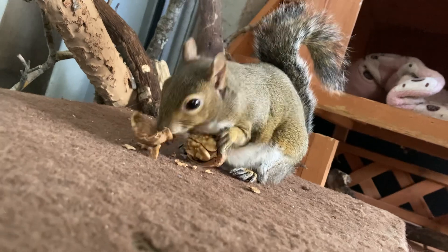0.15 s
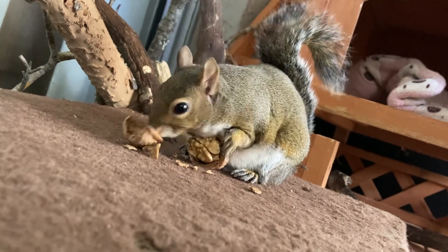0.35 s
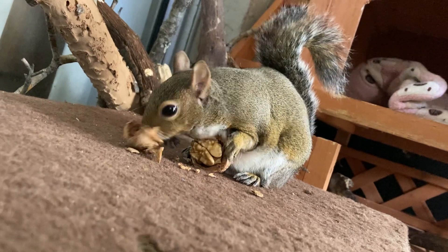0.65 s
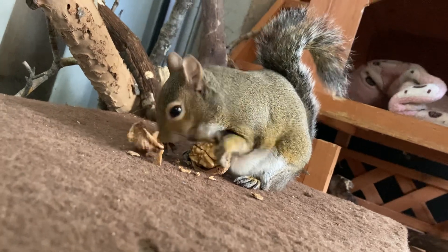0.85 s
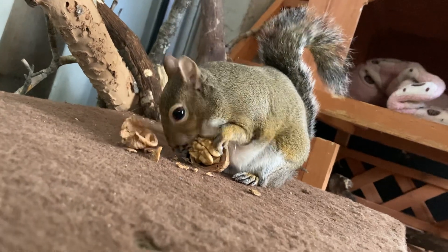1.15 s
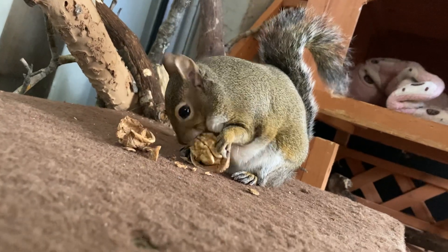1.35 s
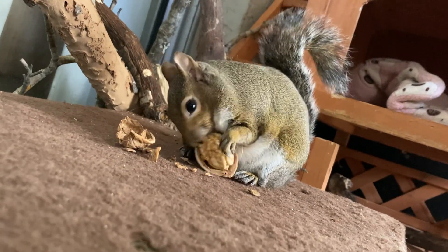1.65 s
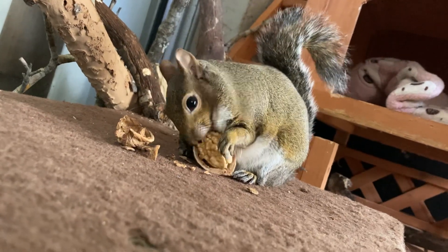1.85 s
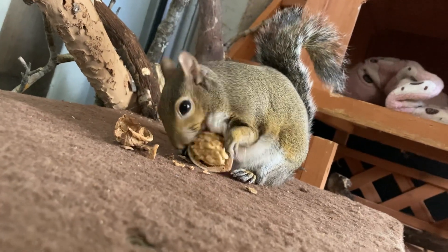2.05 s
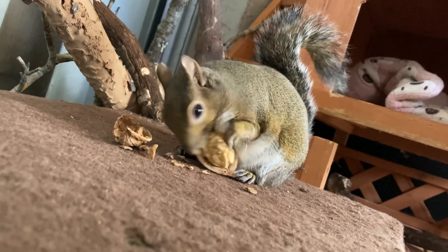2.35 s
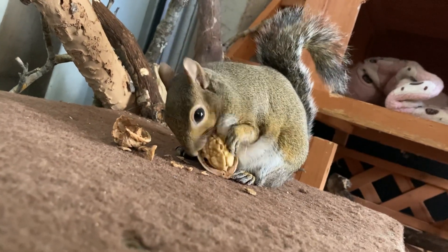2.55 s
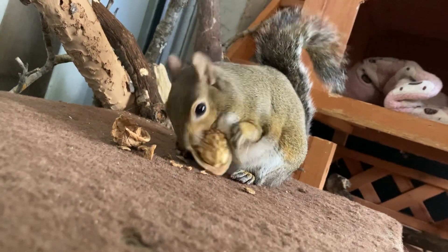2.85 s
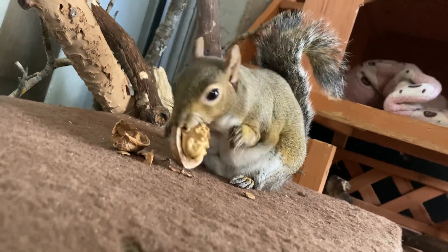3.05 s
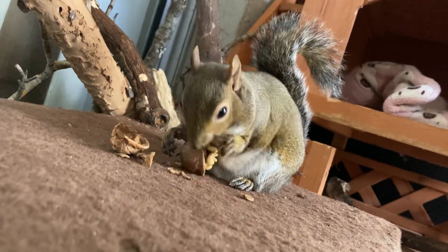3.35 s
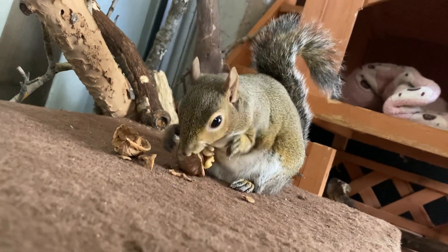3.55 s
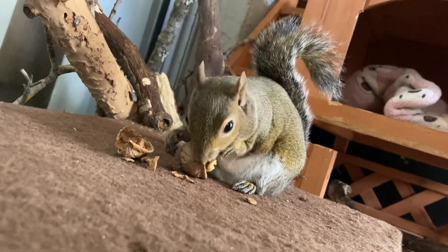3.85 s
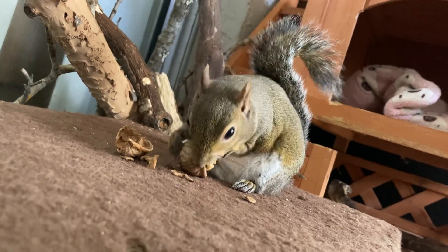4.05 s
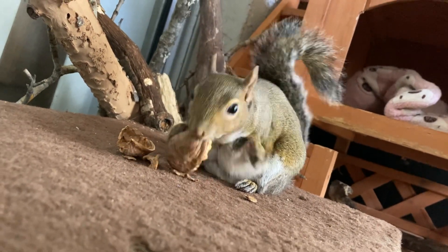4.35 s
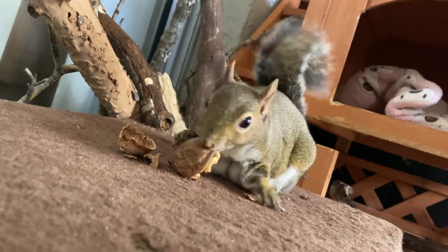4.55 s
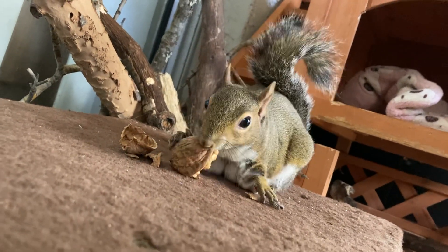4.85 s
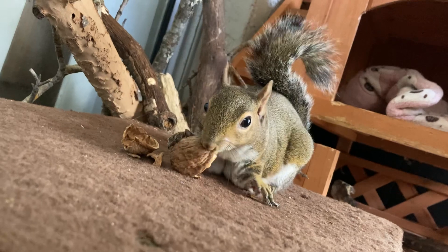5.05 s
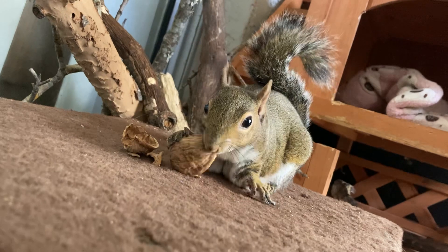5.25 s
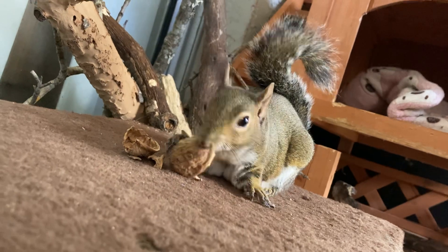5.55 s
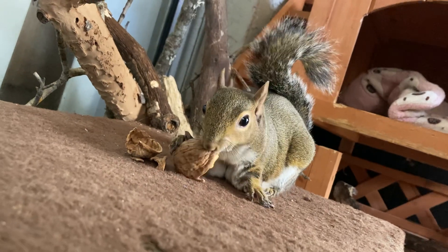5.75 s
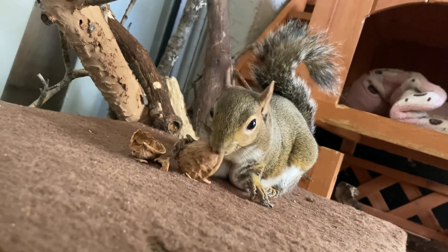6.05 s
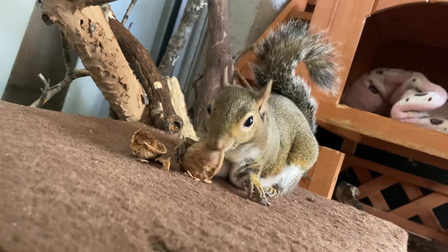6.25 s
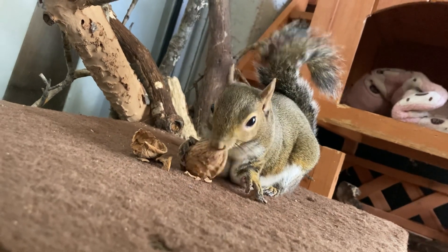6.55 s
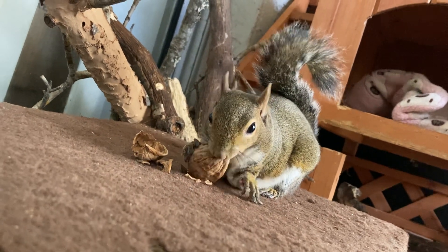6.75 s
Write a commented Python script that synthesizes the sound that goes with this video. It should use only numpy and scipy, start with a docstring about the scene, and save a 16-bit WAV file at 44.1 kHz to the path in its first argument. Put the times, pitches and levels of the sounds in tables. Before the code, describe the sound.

A squirrel gnaws a walnut close to the microphone in a small room with very little echo. A low rumble and wavering hum run throughout, swelling slightly after 4 seconds; a faint distant engine drone fades within the first second. At 0.1 seconds the shell gives a sharp snap. From about 1 to 2.7 seconds come soft ticks, small crunches and light hollow knocks as the shell is turned, then a near lull until 4 seconds. Harder biting follows: a click at 4.2, crunchy cracks around 4.5, a loud snap at 5.3 and a quick cluster near 5.8. More sharp cracks bunch at 6.4, and another loud one comes at 6.8 seconds. The cracks are dry, brittle and bright, with smaller ticks scattered between them. Faint scrapes of teeth on shell and rustles of paws, fur and crumbs fill the gaps.

```python
"""A walnut shell cracks as a squirrel noses, turns and then gnaws it near a two-port microphone.
Each slip of the teeth is a train of fractures that excites the shell's damped modes and radiates a snap.
Between bites, the friction of fur, paws and crumbs makes a rustle; a small room adds a short tail.
Under it lie a low rumble, two wavering hums, a brief faint hiss and, early on, a distant engine."""
import sys
import numpy as np
from scipy import signal
from scipy.fft import rfft, irfft, next_fast_len
from scipy.io import wavfile
from scipy.ndimage import uniform_filter1d

SR = 44100
rng = np.random.default_rng(int(sys.argv[2]) if len(sys.argv) > 2 else 0)


def generate_wav(signal):
    """Clip the signal to [-1, 1] and save it as 16-bit WAV at the path in sys.argv[1]."""
    frames = np.transpose(np.atleast_2d(signal))
    scaled = np.clip(frames, -1, 1) * 32767
    pcm = np.round(scaled).astype(np.int16)
    wavfile.write(sys.argv[1], SR, pcm)


N = 304290

# cracks of the shell: t/s, ring/dB, knock/dB, snap/dB, crunch length/ms, ring centre/Hz,
# snap tilt/(dB per octave)
CRACKS = [(0.1082, -38.5, -71, -21, 0.46, 3630.0, 8.5), (0.1111, -35, -70, -23, 10.9, 3570, 3.0),
          (0.1482, -51, -82, -55, 5, 3400, -3), (0.295, -60.5, -82, -54, 3, 3110.0, 0),
          (0.5037, -61, -65.5, -54, 9.6, 3800, -4), (0.8688, -61, -59, -66.5, 19, 2540, -11.0),
          (0.9279, -57.5, -74, -48, 6.3, 3600.0, 3), (1.1979, -41.5, -49.5, -49, 9.2, 3100, -6),
          (1.224, -51, -71.0, -60, 3.6, 2270, -4), (1.5806, -45, -61.5, -70, 13, 2630, -11),
          (1.823, -47.5, -77, -65, 11.5, 2430, -8.0), (1.959, -44.5, -77, -56, 10, 2490, 3),
          (2.0256, -34.5, -60, -42.5, 8, 2344, 1), (2.162, -47.5, -57, -55, 1.95, 3030, -19),
          (2.375, -50, -55.5, -61, 14, 2880, -7), (2.541, -42.5, -57.5, -54, 17.4, 3200, -7),
          (2.6849, -49.5, -57, -59.5, 21, 2840, -1.0), (3.154, -61.5, -75, -62.5, 35, 3200, -1.5),
          (3.494, -53, -63, -69.5, 7.1, 3500, 0), (4.051, -50, -68, -53, 31, 3400, -1.5),
          (4.137, -48, -72.0, -46.0, 0.97, 3510.0, 2), (4.1572, -31.5, -37.5, -41.5, 1.36, 2780, -10),
          (4.205, -71.5, -70, -49, 3.4, 2570.0, -2), (4.2377, -53, -67, -51.5, 8.1, 2900, 2),
          (4.437, -50.5, -66, -42, 1.6, 3180.0, 2), (4.4923, -21, -44.5, -31.5, 14.6, 2140, 2),
          (4.5632, -61.5, -72.0, -25.5, 1, 3740.0, 1.5), (4.5722, -40, -71, -32, 1.4, 3730.0, -2.0),
          (4.5817, -28.5, -61, -31, 0.84, 3030, -5), (4.6034, -20.5, -50, -20, 18, 2700, 3.5),
          (4.676, -63.0, -80.5, -25.5, 0.6, 2570.0, 11.5), (4.7177, -33, -41.5, -44, 1.1, 2440, -7),
          (4.7663, -41.0, -50, -45, 2, 2610, 4), (4.8398, -47.5, -48, -51, 0.3, 2400, -15),
          (4.865, -50, -79, -42.5, 4.5, 2940.0, -9), (4.884, -42, -79, -41, 1, 3280, 1),
          (4.9763, -36, -48.5, -47, 0.17, 2490, -11), (5.0255, -31.5, -62, -28.5, 1.28, 2400, 0.5),
          (5.0758, -59, -49.5, -77.5, 2.1, 1880.0, -2), (5.132, -44.5, -46.5, -63.5, 0.18, 2400, -16),
          (5.232, -44, -44.5, -44, 0.34, 2340, 4), (5.2722, -42.5, -43, -67, 0.27, 2490, -6),
          (5.282, -45, -59.5, -62, 0.37, 2330.0, -13.0), (5.307, -39, -45, -54, 0.37, 2860, -5),
          (5.3432, -11.5, -28.5, -5, 0.79, 2630, 2), (5.346, -25, -36.5, -12.5, 19.5, 2560, 10.5),
          (5.456, -36.5, -51, -31.5, 0.2, 2740, -4), (5.5955, -45, -49, -62, 2.15, 2160, -4),
          (5.6717, -42.5, -48, -77, 1.7, 2200, -9), (5.7246, -23.5, -34.5, -28.5, 2.97, 2420, 5),
          (5.729, -40, -47, -26, 3.4, 3210.0, -10), (5.7501, -55, -70.0, -53, 0.43, 3360.0, -5),
          (5.7664, -16.5, -53, -16.5, 0.63, 2980, 1), (5.7886, -17.5, -60, -14.0, 1.26, 3220, -8),
          (5.8408, -34.5, -37, -36, 0.83, 2480.0, -1), (5.8445, -30.5, -38, -34, 4.9, 2660.0, -10),
          (5.9625, -45.5, -71.5, -48.5, 9.9, 2360, -8.0), (5.9934, -44, -59, -51.5, 14, 2730, 6),
          (6.0284, -43, -61, -36.0, 1.1, 3480.0, 16), (6.125, -44, -54, -65, 1.65, 2420.0, -8.5),
          (6.21, -42.0, -82, -49, 1, 3230, -7), (6.3622, -18, -35, -29.0, 0.29, 2800, -10.5),
          (6.3931, -15, -48, -15.5, 0.38, 3200, 9.5), (6.3961, -14, -40.0, -14.5, 0.9, 3320, 5.5),
          (6.4186, -37.5, -73.5, -27, 1, 3850, 24), (6.4404, -13, -29.5, -14, 0.42, 2780, -3),
          (6.483, -31.5, -62, -36, 0.85, 3620, -7), (6.504, -40, -64.5, -50, 2.7, 3310.0, 0.0),
          (6.6733, -39, -79.0, -52, 4.6, 3090.0, -2), (6.693, -29.5, -41.5, -30, 2.67, 2800, 0),
          (6.712, -41, -68, -39, 2.8, 3480.0, -2), (6.742, -37, -49, -51.0, 0.2, 2500, -8),
          (6.75, -27.5, -59, -42, 0.28, 3120, -16), (6.7603, -9, -29.5, -13.5, 0.51, 3500, 6.5),
          (6.8338, -48, -75.0, -30, 1.1, 3790.0, 7), (6.85, -30.0, -85, -22.5, 1.7, 3900, -1.5)]
SHELL_MODES = [(537, 17, 0.015), (743, 13.5, 0.045), (954, 15, 0.008), (1253, 5.5, 0.017),
               (1685, 7, 0.0069), (2003, 9.5, 0.0091), (2244, 13.5, 0.011), (2430, 9, 0.032),
               (2664, 8, 0.015), (2890, 5.5, 0.024), (3072, 7.5, 0.012), (3445, 8, 0.0043),
               (3740, 9.5, 0.0048)]  # f/Hz, relative level/dB, t60/s
LOOSENESS = [(.6, .1), (1.8, 1.), (2.1, 1.), (2.2, .5), (3.6, .5), (4, .1)]  # how freely the shell lies: t/s, looseness (0 clenched, 1 loose)
RING_BALANCE = [(0, 0.), (2.1, -2), (2.3, 1.5), (4.6, -1), (4.75, 2.5), (6.9, 1.5)]  # the ring shifts as the head turns: t/s, left minus right/dB
# spectra of the fracture, the rubbed shell, the fur and the crumbs: f/Hz, relative level/dB
SNAP_SPECTRUM = [(2500, -41), (4200, -20.5), (5500, -4.5), (7000, -4), (8800, -5.5), (11500, 1),
                 (13500, -9.5), (15300, -6.5), (17000, -20)]
SCRAPE_SPECTRUM = [(1000, -8.5), (1700, -13.5), (2400, -0.5), (3200, -5), (4000, -25.5), (5000, -43)]
FUR_SPECTRUM = [(1800, -24), (3000, -8), (3700, -1), (4500, 0), (5500, -9), (7000, -17)]
CRUMB_SPECTRUM = [(3500, -14.5), (5500, -11.5), (6500, -1.5), (8000, -6.5), (11500, -2.5), (13000, -27),
                  (14500, -15), (17000, -27)]
FIDGET = [(0, -100, -90, -102.5), (.6, -93, -85, -100), (.85, -70, -78, -100), (1.25, -68.5, -79, -100),
          (1.55, -74, -100, -88), (2.6, -77.5, -87, -88), (3.2, -102, -100, -100), (3.95, -85, -83.5, -100),
          (4.2, -72.5, -78, -72.5), (5.3, -71, -85, -85.5), (5.52, -84.5, -102, -82), (6.9, -66, -114, -77)]  # paws and coat shifting: t/s, shell on carpet/dB, fur/dB, crumbs/dB
DRAGS = [(0.066, 0.087, -67.5, -59, -60.5), (0.186, 0.035, -67.5, -64, -70), (0.443, 0.019, -74, -71, -93),
         (0.691, 0.067, -71.5, -85, -77.5), (1.187, 0.036, -54.5, -63, -67.5),
         (1.526, 0.085, -70.5, -81, -71), (2.007, 0.055, -72.5, -99, -70.5), (2.34, 0.049, -67, -91, -88),
         (2.518, 0.049, -58.5, -77, -76), (2.638, 0.043, -64.5, -81, -89),
         (2.833, 0.125, -75, -75.5, -88.5), (3.066, 0.037, -71, -96, -94), (3.192, 0.02, -72, -96, -89),
         (3.484, 0.035, -72, -75, -98), (3.59, 0.017, -79, -90, -95), (3.685, 0.027, -71, -97, -84),
         (3.772, 0.024, -82, -71.5, -105.5), (3.94, .025, -74, -73, -85), (4.015, 0.068, -94, -65.5, -71.5),
         (4.219, 0.059, -67, -65, -79), (4.475, 0.074, -55.5, -81, -62), (4.589, 0.15, -64, -58.5, -61),
         (4.968, 0.081, -67.5, -64, -67.5), (5.159, 0.31, -67, -67.5, -71.5),
         (5.616, 0.037, -62, -54, -66.5), (5.694, 0.11, -58.5, -50.5, -65.5),
         (5.819, 0.067, -73, -59.5, -72), (5.933, 0.069, -63.5, -65.5, -69),
         (6.136, 0.1, -67, -88.5, -71.5), (6.31, 0.16, -58.5, -66, -85), (6.664, 0.097, -68, -62, -72)]  # teeth or paws drawn over the shell: t/s, length/s, shell/dB, fur/dB, crumbs/dB
# phase between the ports for the empty half shell aside and the nut in the paws: f/Hz, left lead/rad
LEAD_ASIDE = [(0, 0.), (2580, 2.1), (4100, 5.3), (5500, 7.), (7000, 6.3), (16500, -6.8)]
LEAD_NUT = [(0, 0.), (2580, 1.4), (3600, 2.5), (5300, 4.6), (7300, 6.1), (16500, -7.3)]
ROOM_DECAY = [(800, 0.2), (2400, 0.11), (3600, 0.05), (12000, 0.075)]  # f/Hz, t60/s (geometric mean of the quick and the slow tail)
AIR_LEVELS = [(0, -51, -56.5), (2, -56.5, -59), (2.4, -53.5, -63), (3.8, -54.5, -62), (4.3, -49, -65),
              (5.1, -50, -60), (6, -50, -63)]  # room tone: t/s, rumble/dB, wash/dB
# spectra of the room tone's two parts: f/Hz, relative level/dB
RUMBLE_SPECTRUM = [(31, -38.5), (39, -5), (50, 16), (62, -0.5), (80, 14), (100, 1), (160, -11), (250, -50)]
WASH_SPECTRUM = [(160, 4), (250, -4.5), (400, -6.5), (650, -5), (800, -11), (1050, -17), (1400, -27),
                 (3000, -28), (11000, -50)]
AIR_COHERENCE = [(60, .992), (130, .95), (290, .75), (640, .4), (1400, .1), (16000, .1)]  # f/Hz, left-right correlation
AIR_BALANCE = [(60, -6), (110, 2), (200, 0.4)]  # f/Hz, left minus right/dB
HUMS = [(61, 31, -59.5), (124.8, 4.3, -69)]  # f/Hz, bandwidth/Hz, level before the swell/dB
HUM_SWELL = [(0, 7), (4.2, 6.5), (5, 10), (6.9, 8.5)]  # t/s, gain/dB
ENGINE_LEVEL = [(0, -74), (.1, -68), (.45, -68), (.62, -80), (.9, -95)]  # t/s, level/dB
ENGINE_ORDERS = [(3, 4), (4, 1), (7, -6), (8, 0)]  # multiple of the fundamental, relative level/dB


def cracks(rise_ms=0.46, damping_ms=1.11, knock_top_hz=1400, knock_balance_db=4.):
    """Impulse response: fractures ring the modes the grip selects, knock the low ones and snap."""
    rings, snaps = np.zeros((2, N)), np.zeros(N)
    t = np.arange(2400) / SR
    sides = np.array([[.5], [-.5]])
    hz, mode_db, t60 = np.transpose(SHELL_MODES)[:, :, None]
    for s, ring_db, knock_db, snap_db, crunch_ms, grip_hz, tilt_db in CRACKS:
        chance = rng.random(136)
        train = slips(crunch_ms, chance)
        # clenched jaws damp most of the ring at once; a loose shell knocks hollow, on few modes
        loose = follow(LOOSENESS, s)[0]
        damped = (1 - loose) * np.exp(-t * 1000 / damping_ms)
        lingering = gain_of(-4 * (4.5 - loose) - 60 * t / np.clip(t60, .006, .05))
        attack = 1 - np.exp(-(t * 1000 / (rise_ms + 0.79 * loose)) ** 2)
        log_width = np.clip(0.49 - 0.92 * loose, .12, 1)
        near_grip = np.exp(-.5 * (np.log(hz / grip_hz) / log_width) ** 2)
        detune = 1 + 0.06 * (chance[72:72 + len(hz), None] - .5)  # the grip shifts every mode a little
        modes = gain_of(mode_db) * (damped + lingering) * attack * np.sin(2 * np.pi * hz * detune * t)
        ring = ([[ring_db]] * 2, near_grip)
        knock = (knock_db + knock_balance_db * sides, hz < knock_top_hz)
        for db, weights in (ring, knock):
            # a small shell radiates little bass
            radiated = np.diff((weights * modes).sum(0), 2, prepend=[0, 0])
            body = signal.fftconvolve(train, radiated)[:len(t)]
            add(rings, s, gain_of(db) * body / abs(body).max())
        add(snaps, s, gain_of(snap_db) * snap(train, tilt_db, chance[-32:]))
    balance_db = follow(RING_BALANCE, np.arange(N) / SR)[0]
    return rings * gain_of(balance_db * sides) + snaps


def slips(crunch_ms, chance, per_ms=1.8, spread_db=7., fade_db=13.):
    """Stick-slip: a first fracture, then smaller ones at random; a longer crunch has more of them."""
    train, ms = np.zeros(2400), np.clip(crunch_ms, .2, 35)
    progress = np.r_[0, chance[1:24]]
    size = gain_of(-fade_db * progress - spread_db * chance[24:48] * (progress > 0))
    polarity = np.sign(chance[48:72] - .5)
    present = np.clip(1 + per_ms * ms - np.arange(24), 0, 1)
    np.add.at(train, (progress * ms * SR / 1000).astype(int), size * polarity * present)
    return train


def snap(train, tilt_db, chance, break_ms=0.17):
    """Brittle fracture: each break tears for a moment and radiates a broadband click."""
    t = np.arange(1, 33) / SR
    grit = rfft((chance - .5) * t * np.exp(-t * 1000 / break_ms), 64)
    tear = irfft(grit / abs(grit))[:48]  # even at all frequencies
    bright = colour_taps([(hz, db + tilt_db * np.log2(hz / 9000)) for hz, db in SNAP_SPECTRUM])
    click = signal.fftconvolve(train, np.convolve(tear, bright))
    return click / abs(click).max()


def rustle(scratches_per_s=900., hiss_db=-3):
    """Friction as shot noise: shell, fur and crumbs each scratch in their own fits over a fine hiss."""
    gains = gain_of(follow(FIDGET, np.arange(N) / SR)) + drags()
    out = 0
    for gain, spectrum in zip(gains, (SCRAPE_SPECTRUM, FUR_SPECTRUM, CRUMB_SPECTRUM)):
        size = gain_of(2.5 * np.minimum(rng.exponential(1, N), 4))
        contacts = rng.random(N) < scratches_per_s / SR
        scratches = unit_rms(size * contacts * rng.choice([-1., 1.], N))
        friction = scratches + gain_of(hiss_db) * rng.standard_normal(N)
        fits = unit_rms(uniform_filter1d(uniform_filter1d(rng.standard_normal(N), 400), 400))
        coloured = signal.oaconvolve(friction * gain_of(5.5 * fits), colour_taps(spectrum))[:N]
        out += gain * unit_rms(coloured)
    return out


def drags(rise_s=0.016, fall_db_per_s=395.5):
    """Sliding contact: the gains of shell, fur and crumbs rise, hold and decay exponentially."""
    start, length, *levels_db = np.transpose(DRAGS)[:, :, None]
    t = np.arange(0, N + 64, 64) / SR
    rise = np.clip((t - start) / rise_s, 0, 1)
    fall = gain_of(-fall_db_per_s * np.maximum(t - start - length, 0))
    return [np.interp(np.arange(N) / SR, t, (rise * fall * gain_of(db)).sum(0)) for db in levels_db]


def ports(x, turn_s=(2.2, 2.3)):
    """Phase difference depends on direction: it shifts as the animal turns from half shell to nut."""
    size = next_fast_len(N + 4096)
    turned = np.interp(np.arange(N) / SR, turn_s, (0, 1))
    spectrum = 0
    for share, table in ((1 - turned, LEAD_ASIDE), (turned, LEAD_NUT)):
        lead = np.interp(np.fft.rfftfreq(size, 1 / SR), *np.transpose(table))
        spectrum += rfft(x * share, size) * np.exp([1j * lead, 0 * lead])
    return irfft(spectrum, size)[:, :N]


def room(x, late_db=-5.0, correlation=0.081):
    """Reverberation: each band dies at its own rate, with a weak slower tail from the far walls."""
    taps = np.zeros((2, SR // 2))
    arrivals = np.arange(120, SR // 2 - 20, 20) + rng.integers(0, 20, (2, (SR // 2 - 121) // 20))
    np.put_along_axis(taps, arrivals, rng.choice([-1., 1.], arrivals.shape), 1)
    hz, t, bands = signal.stft(taps, SR, nperseg=128)
    fall_db = -60 * t / read(ROOM_DECAY, hz)[:, None]
    decay = gain_of(2 * fall_db) + gain_of(late_db + fall_db / 2)
    response = signal.istft(bands * decay, SR, nperseg=128)[1]
    tail = signal.fftconvolve(x, response / np.linalg.norm(response[0]), axes=1)[:, :N]
    return correlated(*tail, correlation)


def room_tone():
    """Ambient noise: a rumble and a soft wash above it swell independently."""
    rumble, wash = gain_of(follow(AIR_LEVELS, np.arange(N) / SR))
    return (rumble * drifting_noise(RUMBLE_SPECTRUM, patchy_db=0.1)
            + wash * drifting_noise(WASH_SPECTRUM, patchy_db=3.5))


def drifting_noise(spectrum, patchy_db):
    """Diffuse field: noise with drifting spectral patches, coherent at the ports only in the bass."""
    frames, hz = N // 512 + 5, np.fft.rfftfreq(2048, 1 / SR)
    a, b, c, d, patches = rng.standard_normal((frames, 1025, 5)).T
    patches = unit_rms(uniform_filter1d(uniform_filter1d(patches, 6, 0), 12, 1))
    bands = correlated(a + 1j * b, c + 1j * d, read(AIR_COHERENCE, hz)[:, None])
    balance_db = read(AIR_BALANCE, hz)[:, None] * np.array([.5, -.5])[:, None, None]
    bands *= gain_of(read(spectrum, hz)[:, None] + patchy_db * patches + balance_db)
    return unit_rms(signal.istft(bands, nperseg=2048, noverlap=1536)[1][:, :N])


def hums():
    """Random modulation: two low tones waver in level and phase, slightly louder on the right."""
    t, out = np.arange(N) / SR, np.zeros(N)
    for hz, width_hz, db in HUMS:
        pole = np.exp(-np.pi * width_hz / SR)
        noise = rng.standard_normal(N) + 1j * rng.standard_normal(N)
        waver = signal.lfilter([1], [1, -2 * pole, pole * pole], noise)
        out += gain_of(db) * unit_rms((waver * np.exp(2j * np.pi * hz * t)).real)
    return out * gain_of(follow(HUM_SWELL, t)[0]) * gain_of([[-.8], [.8]])


def engine(fundamental_hz=53.6):
    """Harmonic series: a far engine at steady speed is heard as a few of its orders, then fades."""
    t = np.arange(N) / SR
    drone = sum(gain_of(db) * np.sin(2 * np.pi * (order * fundamental_hz * t + rng.random()))
                for order, db in ENGINE_ORDERS)
    return gain_of(follow(ENGINE_LEVEL, t)[0]) * drone


def thin_hiss(middle_s=2.1, half_length_s=0.4, hz=6500, db=-91.5):
    """Narrow-band noise: a faint hiss comes and goes once."""
    band = signal.butter(2, hz * np.array([.96, 1.04]), "bandpass", fs=SR, output="sos")
    swell = np.exp(-((np.arange(N) / SR - middle_s) / half_length_s) ** 4)
    return gain_of(db) * swell * unit_rms(signal.sosfilt(band, rng.standard_normal(N)))


def colour_taps(spectrum):
    """Minimum-phase filter: the phase is the Hilbert transform of the log gain."""
    log_gain = read(spectrum, abs(np.fft.fftfreq(2048, 1 / SR))) * np.log(10) / 20
    return np.fft.ifft(np.exp(np.conj(signal.hilbert(log_gain)))).real[:512]


def correlated(left, other, share):
    """Partial coherence: the right channel takes a share of the left."""
    return np.array([left, share * left + np.sqrt(1 - share ** 2) * other])


def gain_of(db):
    """Amplitude ratio of a level in decibels."""
    return 10 ** (np.asarray(db) / 20)


def unit_rms(x):
    """Normalisation to rms 1."""
    return x / np.sqrt(np.mean(x ** 2) + 1e-20)


def read(points, hz):
    """Interpolation on a log-frequency axis."""
    f, value = np.transpose(points)
    return np.interp(np.log(hz + 1), np.log(f + 1), value)


def follow(rows, t):
    """Interpolation of every column at times t."""
    s, *columns = np.transpose(rows)
    return [np.interp(t, s, column) for column in columns]


def add(mix, s, sound):
    """Superposition of a sound from time s on."""
    part = mix[..., round(s * SR):][..., :sound.shape[-1]]
    part += sound[..., :part.shape[-1]]


def scene(tail_db=-11.5):
    """Superposition: direct and reverberant sound reach the ports over the background."""
    direct = cracks() + rustle() + thin_hiss()
    return ports(direct + gain_of(tail_db) * room(direct)) + room_tone() + hums() + engine()


def record(dry, low_cut_hz=30, top_hz=16800):
    """Band limiting: the microphone's low cut, then a steep low-pass."""
    cut = signal.sosfilt(signal.butter(4, low_cut_hz, "highpass", fs=SR, output="sos"), dry)
    return signal.oaconvolve(cut, signal.firwin(511, top_hz, window=("kaiser", 9), fs=SR)[None], "same")


dry = scene()
out = record(dry)
generate_wav(out)
```